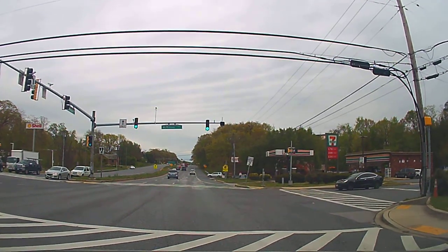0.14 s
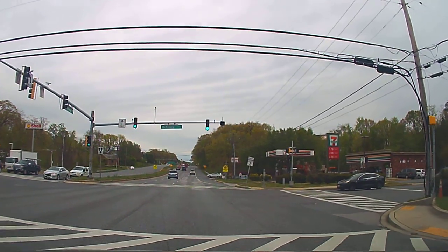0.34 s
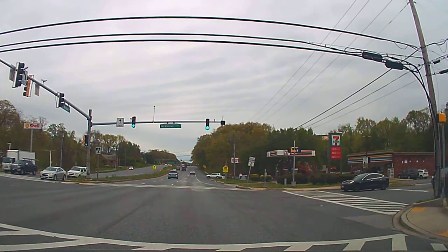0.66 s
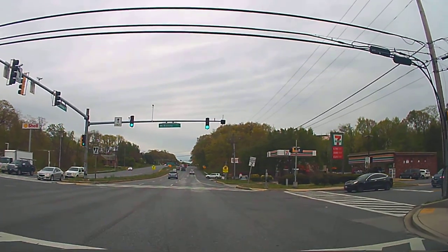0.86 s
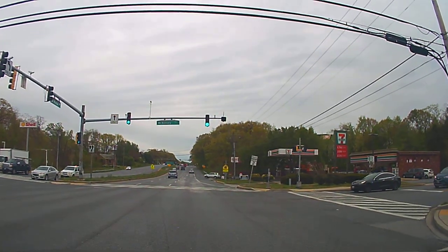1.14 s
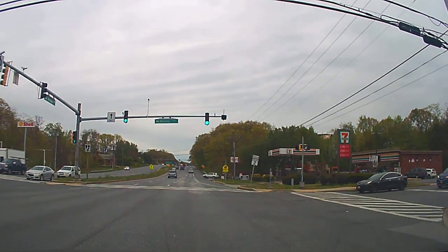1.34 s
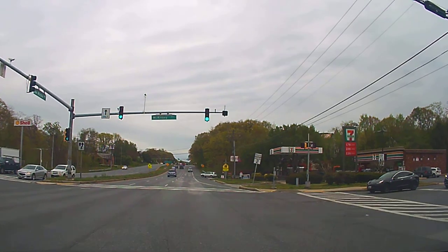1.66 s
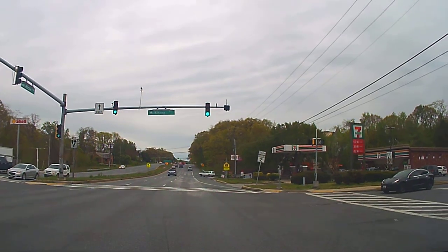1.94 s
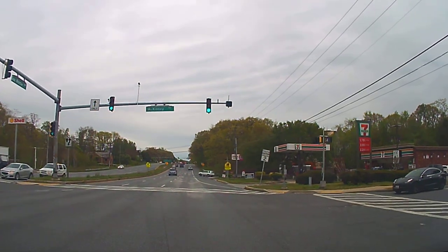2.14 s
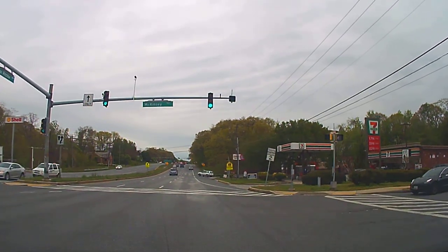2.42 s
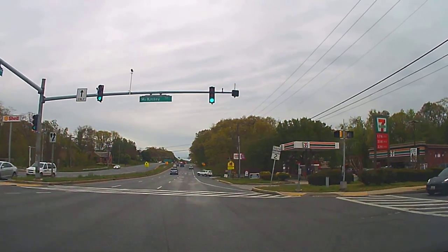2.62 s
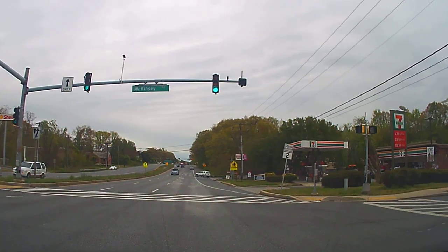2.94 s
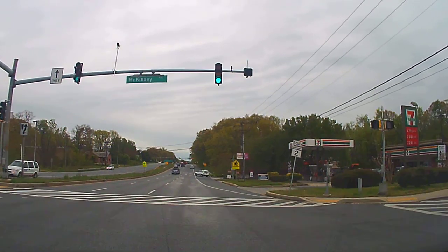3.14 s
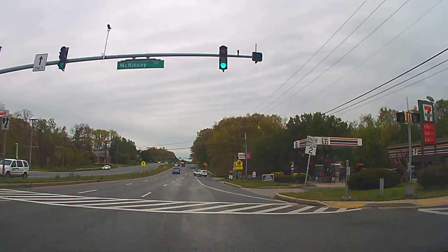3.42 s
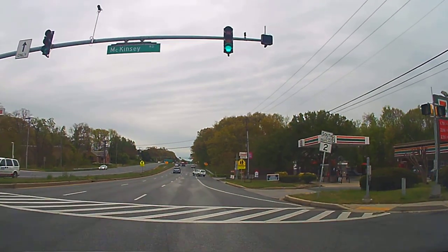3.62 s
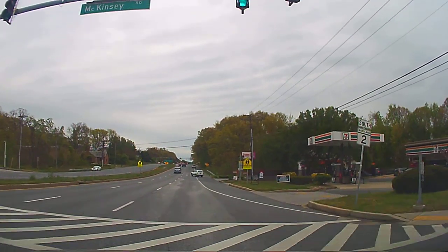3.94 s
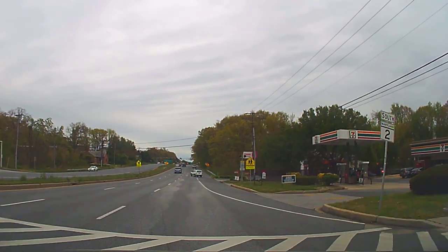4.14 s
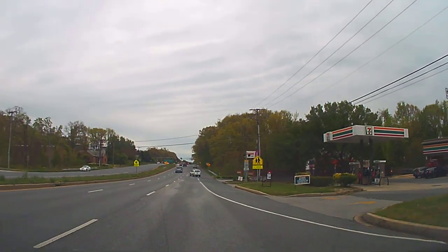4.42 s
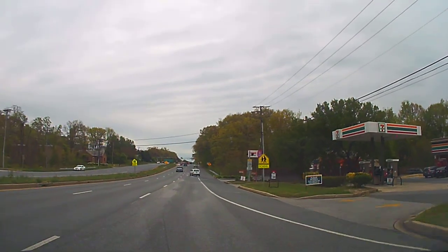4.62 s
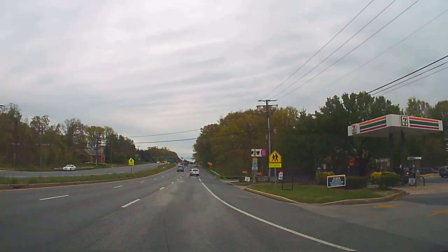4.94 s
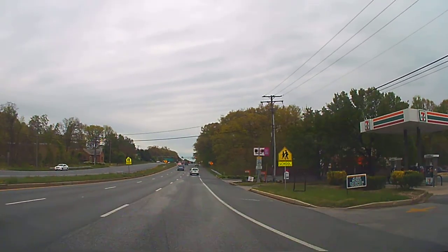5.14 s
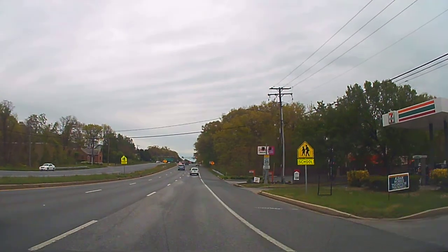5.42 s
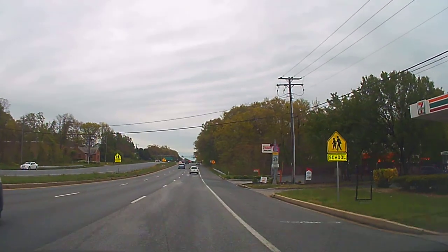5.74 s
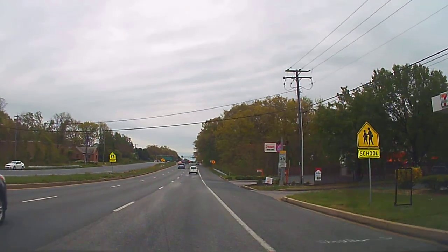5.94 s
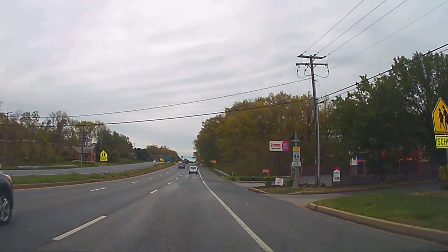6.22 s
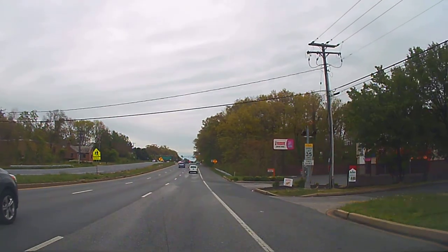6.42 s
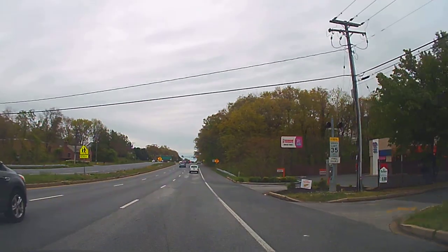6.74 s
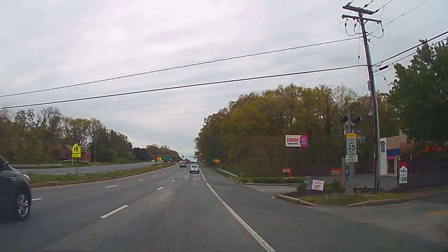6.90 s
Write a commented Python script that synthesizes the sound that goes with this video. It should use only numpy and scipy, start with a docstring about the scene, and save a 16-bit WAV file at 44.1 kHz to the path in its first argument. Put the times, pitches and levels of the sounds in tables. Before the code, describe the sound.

Microphone in the cabin of a car pulling away, dry and enclosed. Low-frequency shake and boom sit under a rising engine note with two upshifts. A brief wavering whine climbs around the first second. Road noise thickens, then a cluster of dull bumps rattles the trim between 4.3 and 4.9 seconds. Scattered small ticks follow over steady roar, faint airflow and thin high device noise.

```python
"""Car cabin, pulling away

Microphone inside a car that pulls away from a junction. The engine climbs through three gears as
summed crank orders, and a gear whine rises in two swept, throbbing tones. Coloured noise gives the road
and a steady vent; pressure pulses give the bumps, struck resonators the trim rattles.
Faint behind it, a small camera's electronics hiss, whine and buzz in bursts."""
import sys
import numpy as np
from scipy import signal
from scipy.fft import rfft, irfft
from scipy.io import wavfile
from scipy.ndimage import uniform_filter1d

SR = 44100
rng = np.random.default_rng(int(sys.argv[2]) if len(sys.argv) > 2 else 0)


def to_wav(sig):
    """Store sig (one row per channel, or 1-D mono) as 16-bit WAV at the path in sys.argv[1].

    Samples outside -1..1 are clipped; the rate is SR.
    """
    pcm = np.clip(np.atleast_2d(sig), -1, 1) * 32767
    pcm = np.round(pcm).astype(np.int16)
    wavfile.write(sys.argv[1], SR, pcm.T)  # frames by channels


N = 311787
T = np.arange(N) / SR   # time/s

# Engine in each gear: [t/s, firing f/Hz, base level of the other orders/dB]
GEAR_RUNS = [
    [(0, 64.5, -57), (.3, 76.2, -66), (.55, 87.5, -61), (.66, 92.36, -56), (1.3, 100.3, -61),
     (1.85, 115.6, -59), (2.45, 132.3, -49.5), (2.72, 125.1, -73)],
    [(2.85, 98.5, -56), (3.55, 109.7, -53), (5.0, 133.1, -53), (5.35, 138.3, -57), (5.75, 142.3, -59.5)],
    [(6.0, 97.7, -68), (6.3, 101.5, -56.5), (7.07, 107.1, -55)],
]
# Firing tone as the cabin passes it on: [f/Hz, level/dB]
FIRING_RESPONSE = [(63, -26), (74, -29.5), (87, -26), (93, -36.5), (101, -39), (110, -43), (118, -52),
                   (129, -41), (140, -50)]
# Cycles per crank turn; six cylinders fire at order 3, the others leak through: [order]
OTHER_ORDERS = [1.5, 4, 4.5, 5, 5.5, 6, 7.5, 8, 9]
# Level of each of those orders, relative to the base level: [level/dB]
OTHER_ORDER_LEVELS = [13, -3.5, -3.5, -21.5, -3, -2.5, -3, -6, -2]
FIRING_OCTAVE_DB = -26   # relative to the firing tone
# A cabin resonance lifts any crank order passing through it
CABIN_HZ, CABIN_WIDTH_HZ, CABIN_LIFT_DB = 348.5, 24, 6.5

# Gear teeth, heard in two stretches: [t/s, f/Hz, level/dB]
WHINE_RUNS = [
    [(.45, 325, -52), (.7, 405.6, -52.5), (.935, 502, -53), (.965, 516.5, -35.5), (1.03, 542, -40.5),
     (1.1, 560.7, -37.5), (1.23, 605.5, -54), (1.37, 661.6, -45), (1.55, 703, -52), (1.92, 812, -60)],
    [(3.6, 1545, -72), (3.9, 1616, -64), (4.4, 1779, -71)],
]
THROB_HZ, THROB_FIRST_DIP_S, THROB_DEPTH = 11.2, 1.052, .85   # depth 0-1

# Tyre roar over time: [t/s, level/dB]
ROAR_COURSE = [(0.15, -51.5), (0.6, -48), (1.07, -47.5), (2.1, -44.5), (2.65, -45), (4.15, -43.5),
               (4.3, -41.5), (6.16, -41.5), (7.05, -41)]
# Body swaying on its springs: [t/s, level/dB]
SWAY_COURSE = [(0, -22), (.3, -41), (1.15, -21.5), (1.42, -32), (1.65, -21), (1.9, -32), (2.05, -23.5),
               (2.72, -26), (2.85, -15), (3.12, -31.5), (3.4, -19.5), (3.6, -25), (4.4, -21), (4.9, -23),
               (5.7, -26), (5.8, -20), (6.3, -29.5), (7.07, -21.5)]
# Colours of body shake, cabin boom, tyre roar and road hiss: [f/Hz, relative level per Hz/dB]
SHAKE_COLOUR = [(3, -9), (6, -10.5), (14, -4), (27, 4), (38, 0), (55, -14.5), (75, -16.5), (120, -54)]
BOOM_COLOUR = [(35, -53), (55, 13), (90, 0), (130, -2), (160, -28.5), (220, -48)]
ROAR_COLOUR = [(88, -30), (150, 1), (161, -5.5), (237, 2.5), (280, -7.5), (336, -2.5), (449, -7.5),
               (493, -3.5), (554, -1.5), (622, -5), (659, -9.5), (850, -17), (1100, -21), (1870, -120)]
HISS_COLOUR = [(500, -21), (800, -4.5), (1050, -12), (1140, -3.5), (1195, 3), (1250, -5.5), (1370, -10),
               (1700, -13.5), (2350, -27), (2620, -22.5), (2900, -27), (3500, -37.5), (4500, -69),
               (6000, -75)]
# Boom and hiss levels when the roar is at its reference, and their share of its swing
ROAR_REFERENCE_DB = -45
BOOM_DB, BOOM_FOLLOWS = -35.5, 0.98
HISS_DB, HISS_FOLLOWS = -55.5, 1.36
# Wheels over the worst bumps push the cabin air: [t/s, peak level/dB, width scale/ms]
BUMP_PUSHES = [(4.28, -16.5, 4.3), (4.301, -14.5, 2.6), (4.315, -11.5, 3.6), (4.361, -14, 4.1),
               (4.39, -14, 2.7), (4.519, -16, 4.3), (4.568, -4.5, 4.8), (4.642, -5, 6), (4.72, -13, 5.7),
               (4.806, -15.5, 5), (4.849, -7.5, 8.5), (4.896, -11, 5.4)]

# Clear ticks of loose trim: [t/s, blow level/dB]
TRIM_TICKS = [(2.0897, -46.5), (2.854, -47.5), (3.276, -53), (4.0365, -45), (4.32, -38.5), (4.346, -34.5),
              (4.3529, -48), (4.384, -50), (4.3915, -54), (4.4409, -49), (4.5031, -51), (4.5098, -53),
              (4.563, -39), (4.6095, -47), (4.642, -40.5), (4.6465, -42), (4.676, -41), (4.684, -47),
              (4.7673, -44), (4.8437, -50), (4.848, -48), (4.886, -45.5), (5.1113, -47.5), (5.1458, -53),
              (5.2387, -52), (5.3617, -44), (5.3997, -52), (5.5053, -51), (5.7194, -54), (5.778, -39.5),
              (5.8142, -52), (5.86, -49), (6.0446, -50), (6.1959, -47), (6.274, -52), (6.3697, -52),
              (6.3904, -51), (6.551, -49), (6.586, -46.5), (6.6222, -49), (6.6517, -44), (6.6847, -46),
              (6.7238, -47.5), (6.7898, -47), (6.903, -42.5), (6.9334, -48), (7.0072, -46), (7.0404, -53)]
# Resonances of the trim: [f/Hz, relative level/dB, t60/s]
TRIM_MODES = [(1800, -5, 0.0067), (2280, -6, 0.011), (2780, -6.5, 0.0073), (3260, -8.5, 0.0076),
              (4010, -14.5, 0.022), (5210, -4.5, 0.011), (6120, -4.5, 0.0098), (7040, -7, 0.0087),
              (8680, -9.5, 0.0097), (9700, -12, 0.0069), (12500, -4.5, 0.0012), (13900, -19, .002)]
TRIM_CONTACT_MS = 1.0   # decay time of the scrape
REBOUND_S, REBOUND_LOSS_DB = .007, 13
FAINT_FROM_S, FAINT_DB, FAINT_COUNT = 4.3, -56, 14   # random faint ticks from the rough patch on
# Sharp snaps without ringing: [t/s, initial level/dB]
SNAPS = [(1.3131, -41), (4.2861, -36), (4.5694, -28), (4.5724, -23), (4.5754, -37), (4.6011, -46),
         (4.6149, -34), (4.6434, -46), (4.8394, -44), (4.85, -34), (4.8898, -39), (5.1733, -47)]

# Strength of the processor bursts: [t/s, level/dB]
BURST_STRENGTH = [(0, -72), (.75, -82), (.8, -69), (2.0, -67), (5.9, -67), (5.98, -71), (7.07, -70)]
# Ringing of each burst tick: [f/Hz, relative level/dB, t60/s]
BURST_MODES = [(5270, -1, .005), (5300, 0.5, 0.0089), (5630, 4.5, 0.011)]
# Colour of the burst hiss: [f/Hz, relative level per Hz/dB]
BURST_HISS_COLOUR = [(11500, -50), (12800, 2), (13500, 6), (14200, -8), (15200, -24)]
# A pair of bursts in every period, and one more each second
BURST_PERIOD_S, FIRST_BURST_S, SECOND_BURST_S, SECONDLY_BURST_S = .4, .026, .188, .685
BURST_LENGTH_S, BURST_TICKS_PER_S = .09, 95
# Hiss at reference strength, and its share of the swing in strength
BURST_REFERENCE_DB, BURST_HISS_DB, BURST_HISS_FOLLOWS = -67, -74.5, 0.51
THIN_NOTE_HZ, THIN_NOTE_DB, THIN_NOTE_UNDER_DB = 5650, -84, -68   # weak bursts add one thin note

# Colour of the preamp hiss: [f/Hz, relative level per Hz/dB]
PREAMP_COLOUR = [(600, -20), (1500, 3), (3000, 3), (4500, 2), (7000, 0), (9000, 1), (10500, -2),
                 (12000, -1.5), (14000, -1.5), (15000, -4), (15800, -8.5)]
PREAMP_DB = -68

# High line tones, the close pair beats: [f/Hz, rms level/dB]
LINE_TONES = [(15734.34, -87), (15747.21, -91), (14712.3, -95)]
# Ringing of the tick at every field: [f/Hz, level/dB, t60/s]
FIELD_TICK_MODES = [(8400, -71, .004)]
SCAN_HZ, FIELD_HZ, SCAN_DB = 7867.17, 60.055, -72   # display scan: half the line rate, field rate, rms
CHIRP_HZ, CHIRP_PER_S, CHIRP_FIRST_S, CHIRP_DB = 12880.48, 19.88, .03, -79   # rms while on

# Colour of the steady airflow: [f/Hz, relative level per Hz/dB]
VENT_COLOUR = [(700, -23), (1500, 0), (2500, -3), (4000, -16), (6000, -45)]
VENT_DB = -72.5

CUTOFF_HZ = 15800


def amp(db):
    """dB to gain."""
    return 10 ** (np.asarray(db) / 20)


def in_time(rows):
    """Columns of a time table after the first, one value per sample."""
    s, *columns = np.transpose(rows)
    return [np.interp(T, s, column) for column in columns]


def noise(colour):
    """Noise of the given colour, rms 1, interpolated over log frequency."""
    hz, level_db = np.transpose(colour)
    grid = np.fft.rfftfreq(N, 1 / SR) + 1e-3   # keeps the logarithm finite
    gain = amp(np.interp(np.log(grid), np.log(hz), level_db, right=-200))
    x = irfft(rfft(rng.standard_normal(N)) * gain, N)
    return x / x.std()


def drift(rate_hz):
    """Random wandering, spread 1, mostly below the given rate."""
    return noise([(rate_hz, 0), (10 * rate_hz, -40), (SR, -200)])


def sine(hz):
    """Steady tone, rms 1."""
    return np.sqrt(2) * np.sin(2 * np.pi * hz * T)


def rotation(rows, fade_s=0.11):
    """Phase of a rotating part, and a gain of rms-to-peak size that fades at the ends of its table."""
    start_s, end_s = rows[0][0], rows[-1][0]
    since_start = T - start_s + (start_s == 0)   # a run from time zero starts at full level
    ends = np.minimum(since_start, end_s + fade_s - T)
    phase = 2 * np.pi * np.cumsum(in_time(rows)[0]) / SR
    return phase, np.sqrt(2) * np.clip(ends / fade_s, 0, 1)


def strike(times, blows_db, modes, spread_db, contact_ms=0):
    """Each blow rings all modes of one body at varied strengths; a contact adds a brief dying scrape."""
    at, out = np.round(np.asarray(times) * SR).astype(int), np.zeros(N)
    chance = rng.normal(0, 1, (len(at), len(modes)))
    rough = rng.choice([-1, 1], N)
    fade = np.exp(-1000 / (contact_ms * SR + 1))
    for k, (hz, level_db, t60) in enumerate(modes):
        force = np.full(N, 1e-18)
        force[at] = amp(blows_db + level_db + spread_db * chance[:, k])
        if contact_ms:
            scrape = rough * signal.lfilter([np.sqrt(1 - fade ** 2)], [1, -fade], force)
            force = .9 * force + .35 * scrape
        radius, angle = amp(-60 / (t60 * SR)), 2 * np.pi * hz / SR
        poles = [1, -2 * radius * np.cos(angle), radius * radius]
        out += signal.lfilter([0, np.sin(angle)], poles, force) * (-1) ** k   # modes alternate in sign
    return out


def engine():
    """Firing tone with its octave, and the other crank orders, all locked to one phase in each gear."""
    out = 0
    for gear in GEAR_RUNS:
        phase, ends = rotation(gear)
        firing_hz, orders_db = in_time(gear)
        firing_db = np.interp(firing_hz, *np.transpose(FIRING_RESPONSE)) + .5 * drift(1.9)
        tone = np.sin(phase) + amp(FIRING_OCTAVE_DB) * np.sin(2 * phase)
        out += ends * amp(firing_db) * tone
        for order, order_db in zip(OTHER_ORDERS, OTHER_ORDER_LEVELS):
            crank = order * phase / 3 + rng.uniform(0, 2 * np.pi)
            off = (order * firing_hz / 3 - CABIN_HZ) / CABIN_WIDTH_HZ
            cabin_db = CABIN_LIFT_DB * np.exp(-off ** 2)
            level_db = orders_db + order_db + cabin_db + 1.73 * drift(1.4)
            out += ends * amp(level_db) * np.sin(crank)
    return out


def gear_whine():
    """Gear teeth sing a swept tone of unsteady level, throbbing like two beating tones."""
    since_dip = np.maximum(T - THROB_FIRST_DIP_S, -.5 / THROB_HZ)   # held at full level before the throb
    beat = np.exp(2j * np.pi * THROB_HZ * since_dip)
    throb = np.abs(1 - THROB_DEPTH * beat) / (1 + THROB_DEPTH)
    out = 0
    for whine in WHINE_RUNS:
        phase, ends = rotation(whine)
        level_db = in_time(whine)[1] + 3.1 * drift(22.945)
        out += ends * throb * amp(level_db) * np.sin(phase)
    return out


def road():
    """Body shake, boom, roar and hiss as noise bands, a little patchy with the asphalt."""
    roar_db, = in_time(ROAR_COURSE)
    sway_db, = in_time(SWAY_COURSE)
    swing_db, grain = roar_db - ROAR_REFERENCE_DB, drift(33)
    out = amp(sway_db) * noise(SHAKE_COLOUR)
    out += amp(BOOM_DB + BOOM_FOLLOWS * swing_db) * noise(BOOM_COLOUR)
    out += amp(roar_db + .5 * grain) * noise(ROAR_COLOUR)
    out += amp(HISS_DB + HISS_FOLLOWS * swing_db + 0.92 * grain) * noise(HISS_COLOUR)
    return out


def bumps():
    """Each bump is a soft push of cabin air with suction either side."""
    out = np.zeros(N)
    for s, peak_db, width_ms in BUMP_PUSHES:
        u = (T - s) * 1000 / width_ms
        out += amp(peak_db) * (1 - u ** 2 / 3) * np.exp(-u ** 2 / 6)
    return out


def trim_rattle():
    """Plastic trim scrapes and rings against its seat; each tick bounces once, more softly."""
    faint_s = rng.uniform(FAINT_FROM_S, T[-SR // 20], FAINT_COUNT)
    s, blow_db = np.transpose(TRIM_TICKS + [(t, FAINT_DB) for t in faint_s])
    s, blow_db = np.r_[s, s + REBOUND_S], np.r_[blow_db, blow_db - REBOUND_LOSS_DB]
    return strike(s, blow_db, TRIM_MODES, spread_db=2.0, contact_ms=TRIM_CONTACT_MS)


def trim_snaps():
    """Single impulses through a gentle high-pass: sharp snaps that do not ring."""
    s, level_db = np.transpose(SNAPS)
    clicks = np.zeros(N)
    clicks[np.round(s * SR).astype(int)] = amp(level_db)
    return signal.lfilter([1, -1], [1, -.85], clicks)


def processor_bursts():
    """Processor activity as trains of ringing ticks under a hiss; weak bursts add a thin note."""
    starts = np.r_[np.arange(FIRST_BURST_S, T[-1], BURST_PERIOD_S),
                   np.arange(SECOND_BURST_S, T[-1], BURST_PERIOD_S),
                   np.arange(SECONDLY_BURST_S, T[-1], 1)]
    s = (starts[:, None] + np.arange(0, BURST_LENGTH_S, 1 / BURST_TICKS_PER_S)).ravel()
    s = np.clip(s + rng.normal(0, 0.0014, len(s)), 0, T[-2])   # ticks jitter in time
    tick_db = np.interp(s, *np.transpose(BURST_STRENGTH))
    out = strike(s, tick_db, BURST_MODES, spread_db=1.6, contact_ms=1.7)
    busy = np.any([(T > start) * (T < start + BURST_LENGTH_S) for start in starts], axis=0)
    strength_db, = in_time(BURST_STRENGTH)
    weak = busy * (strength_db < THIN_NOTE_UNDER_DB)
    hiss_db = BURST_HISS_DB + BURST_HISS_FOLLOWS * (strength_db - BURST_REFERENCE_DB)
    # running means soften the on and off edges
    out += amp(hiss_db) * uniform_filter1d(busy * 1., size=900) * noise(BURST_HISS_COLOUR)
    out += amp(THIN_NOTE_DB) * uniform_filter1d(weak * 1., size=200) * sine(THIN_NOTE_HZ)
    return out


def preamp_hiss():
    """Steady coloured noise of the microphone preamp."""
    return amp(PREAMP_DB) * noise(PREAMP_COLOUR)


def display_scan():
    """Scan whine whose sign flips, with a tick, at every field; line tones; a high chirp that blinks."""
    flips = np.sign(np.sin(np.pi * FIELD_HZ * T + 1e-9))
    out = amp(SCAN_DB) * flips * sine(SCAN_HZ)
    for hz, level_db in LINE_TONES:
        out += amp(level_db) * sine(hz)
    gate = (T - CHIRP_FIRST_S) * CHIRP_PER_S % 1 < .35   # on for 35 % of each blink
    out += amp(CHIRP_DB) * uniform_filter1d(gate * 1., size=80) * sine(CHIRP_HZ)
    field_times = np.arange(0, T[-1], 1 / FIELD_HZ)
    return out + strike(field_times, 0, FIELD_TICK_MODES, spread_db=0)


def vent():
    """Steady airflow as coloured noise."""
    return amp(VENT_DB) * noise(VENT_COLOUR)


def scene():
    """All sources summed at one microphone in the cabin."""
    car = engine() + gear_whine() + road() + bumps() + trim_rattle() + trim_snaps()
    electronics = processor_bursts() + preamp_hiss() + display_scan()
    return (car + electronics + vent())[None]


def record(dry):
    """A steep elliptic low-pass cuts the top."""
    return signal.sosfilt(signal.ellip(14, .3, 80, CUTOFF_HZ, fs=SR, output="sos"), dry)


dry = scene()
out = record(dry)
to_wav(out)
```